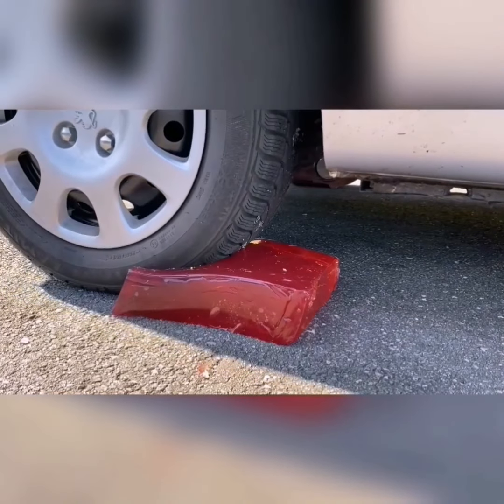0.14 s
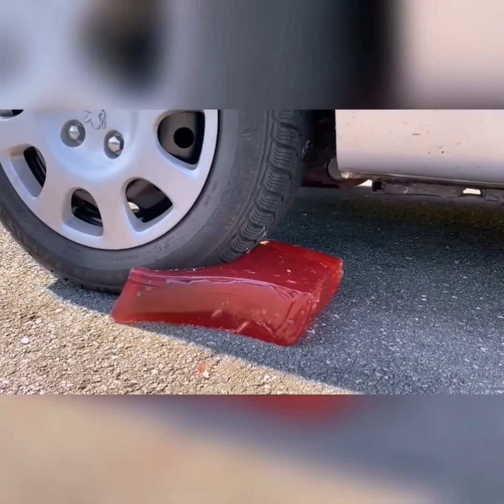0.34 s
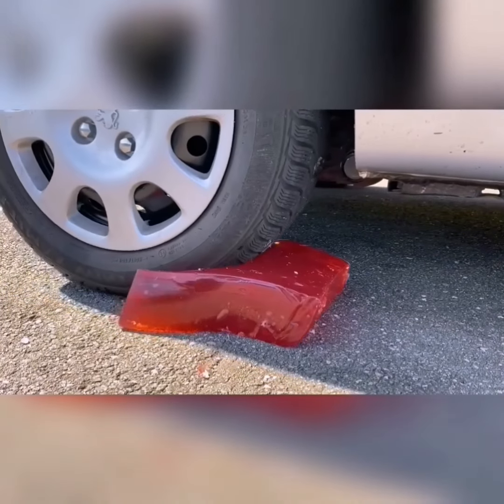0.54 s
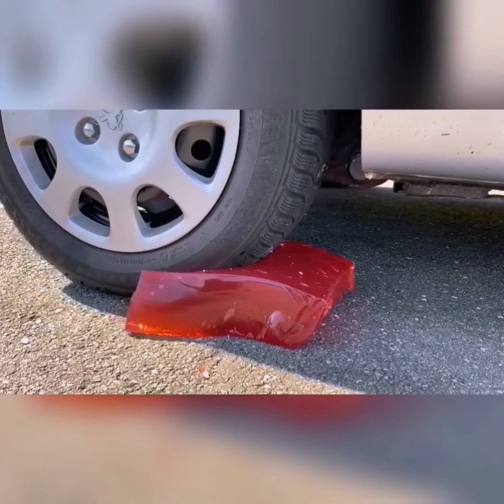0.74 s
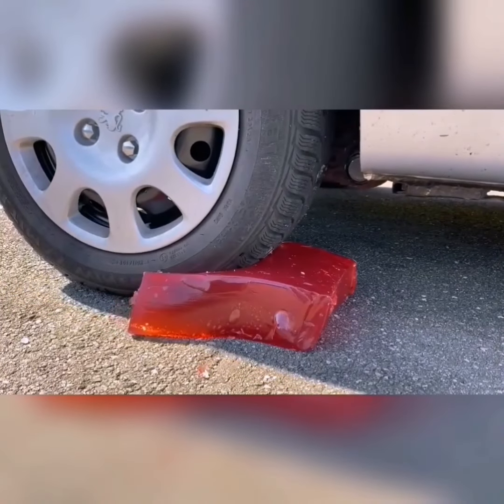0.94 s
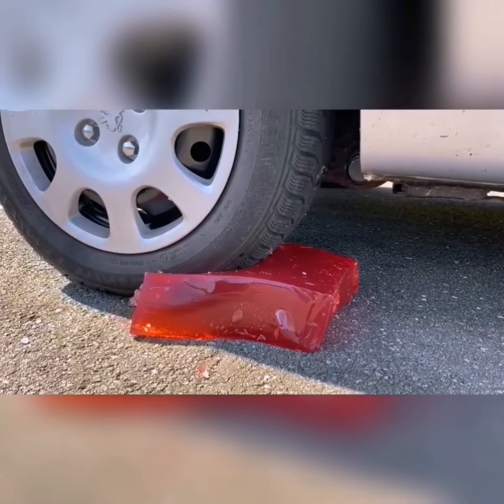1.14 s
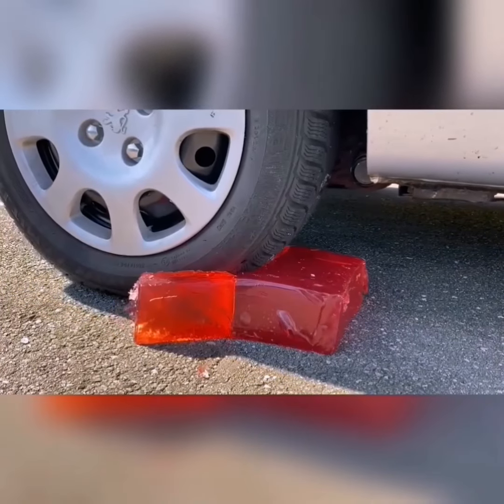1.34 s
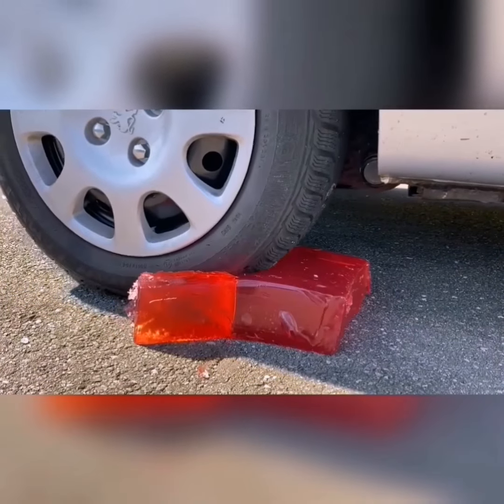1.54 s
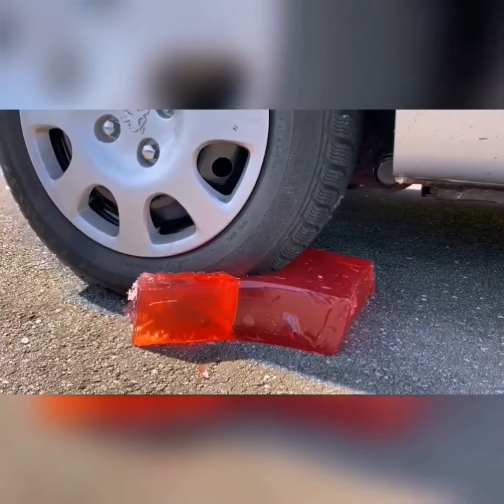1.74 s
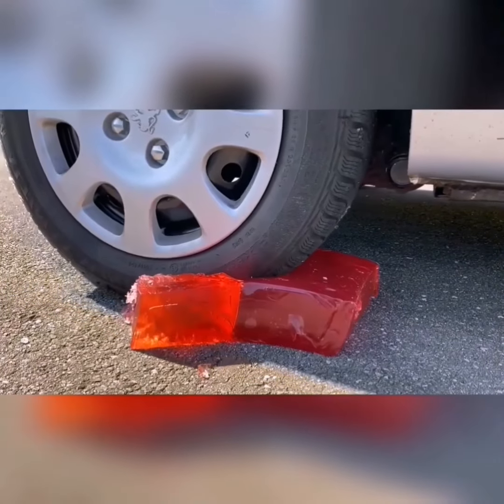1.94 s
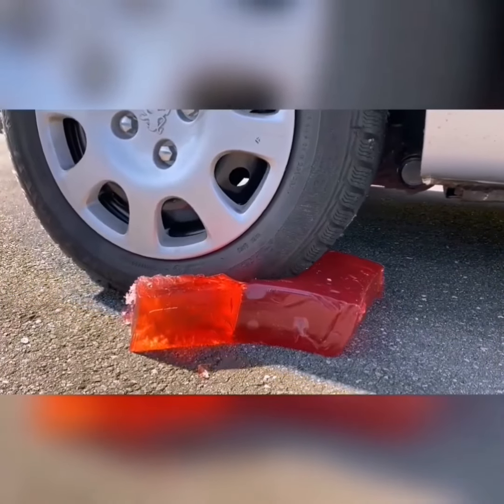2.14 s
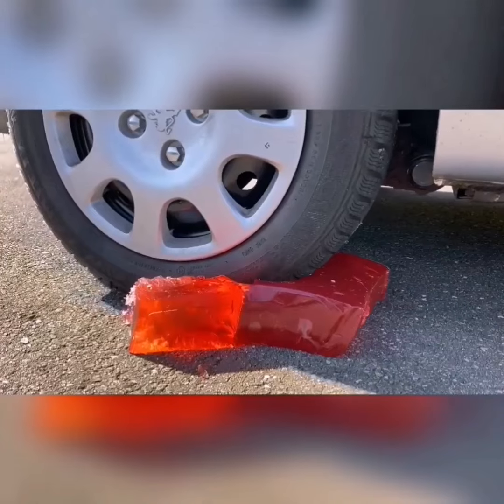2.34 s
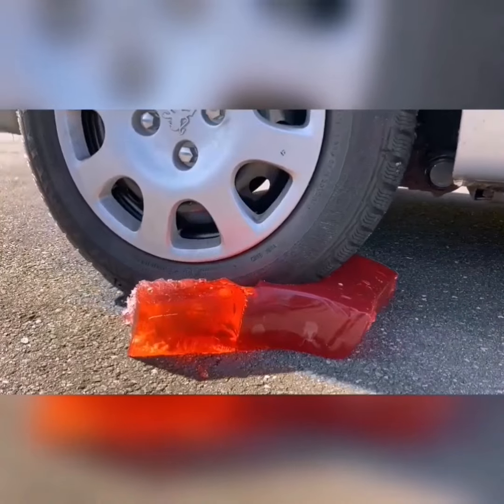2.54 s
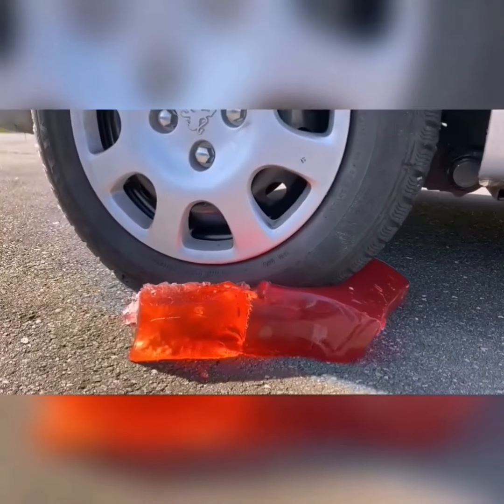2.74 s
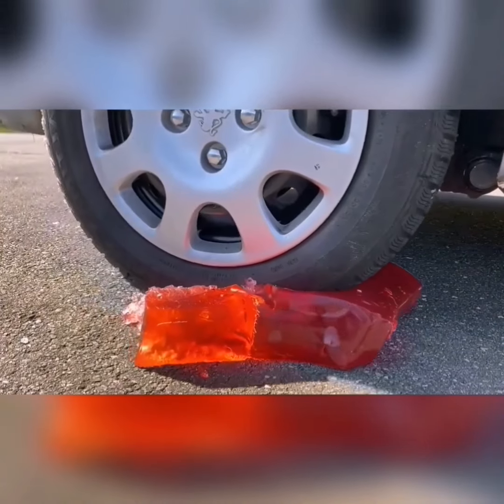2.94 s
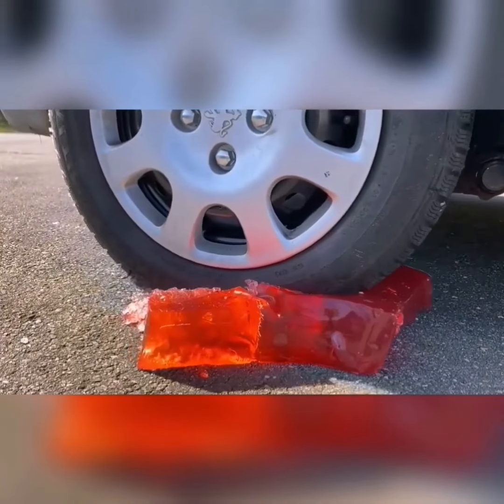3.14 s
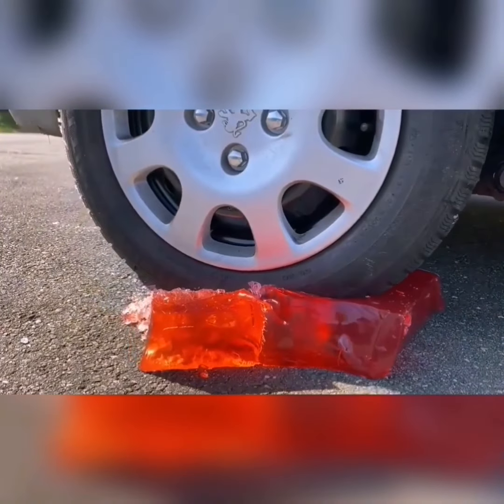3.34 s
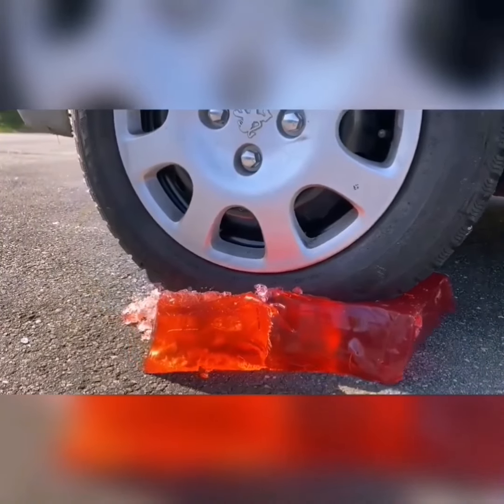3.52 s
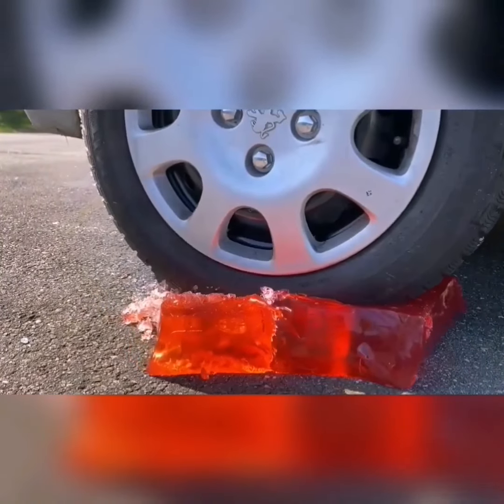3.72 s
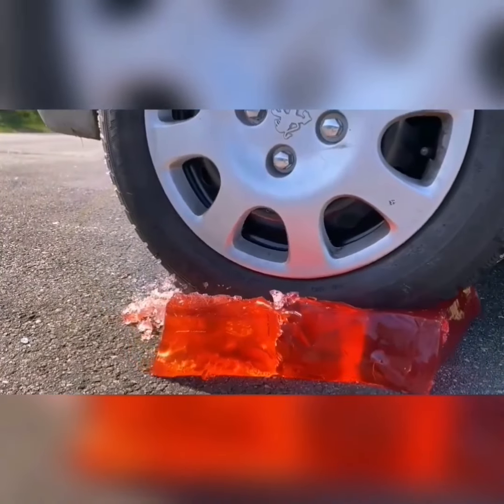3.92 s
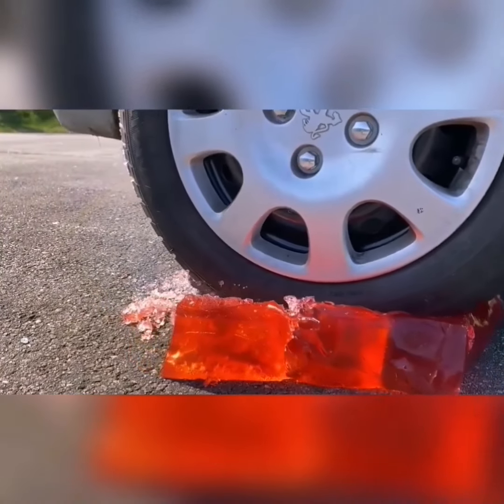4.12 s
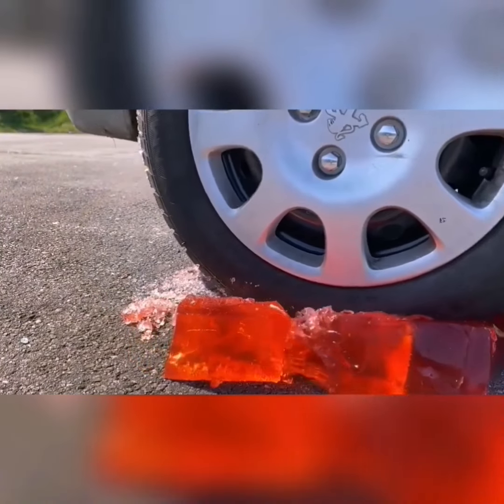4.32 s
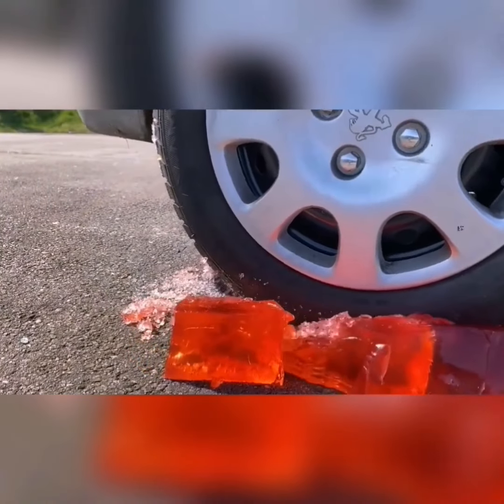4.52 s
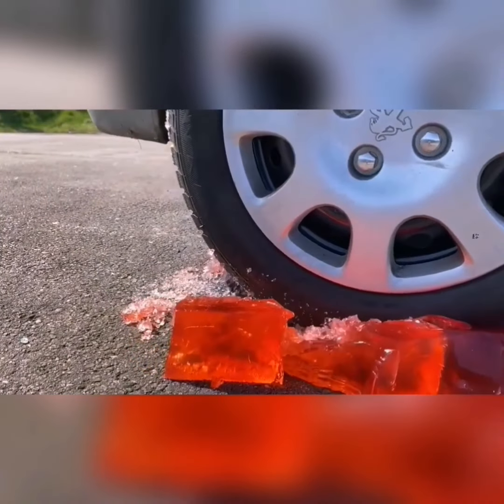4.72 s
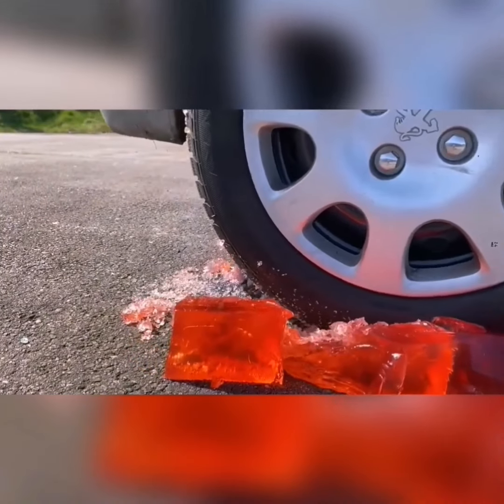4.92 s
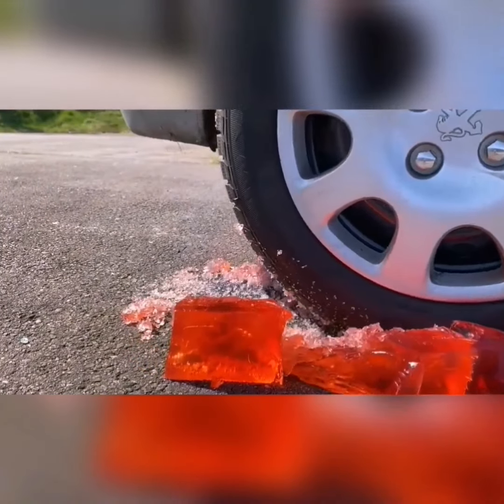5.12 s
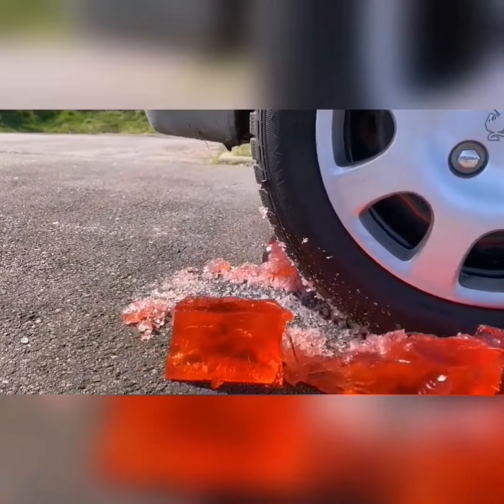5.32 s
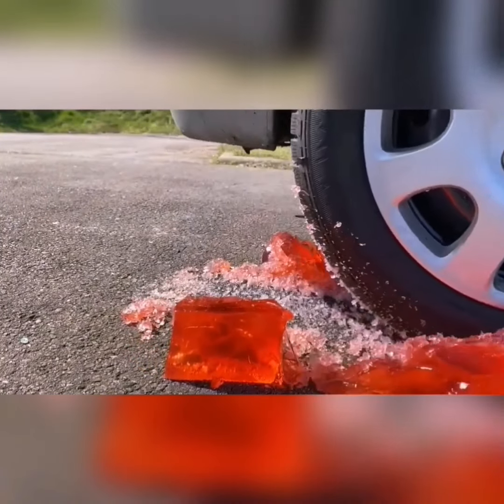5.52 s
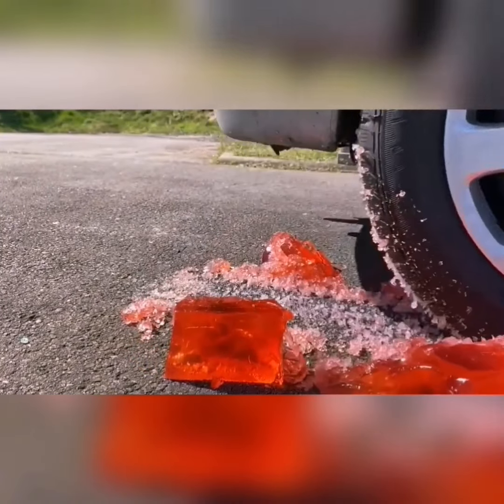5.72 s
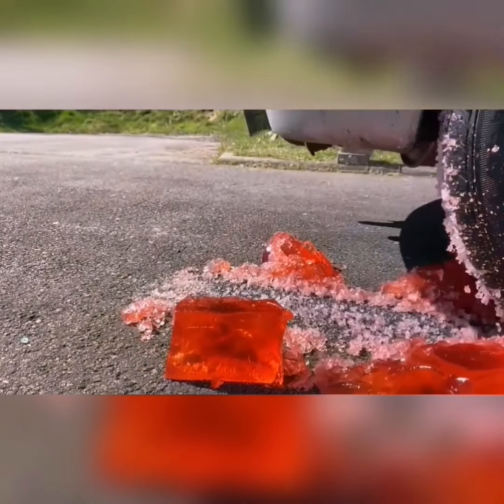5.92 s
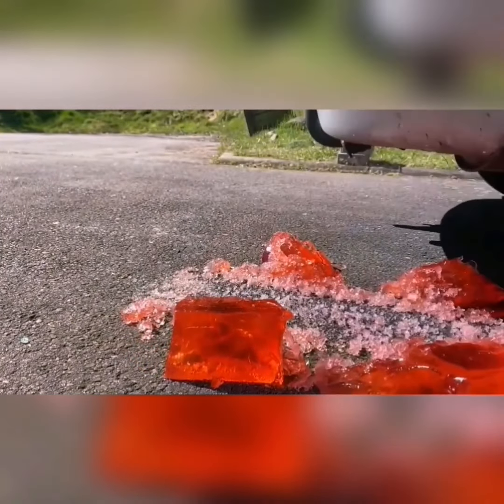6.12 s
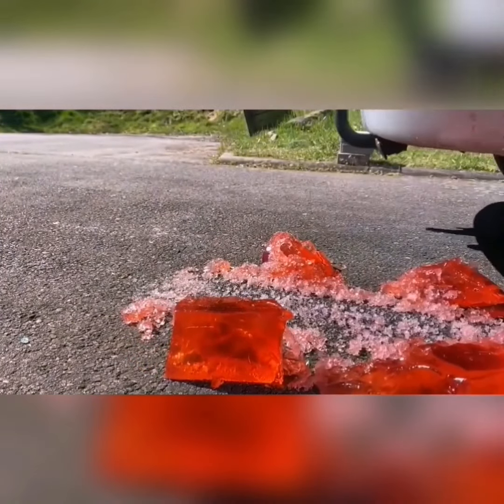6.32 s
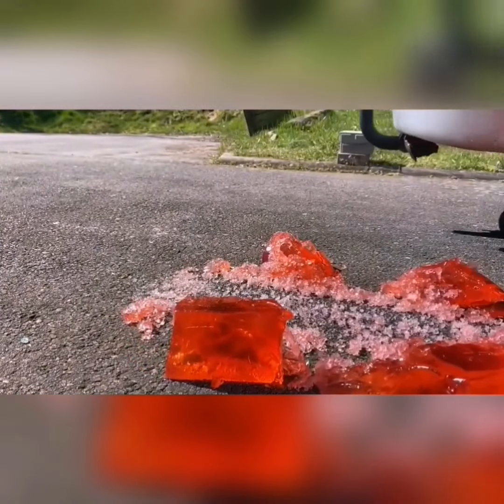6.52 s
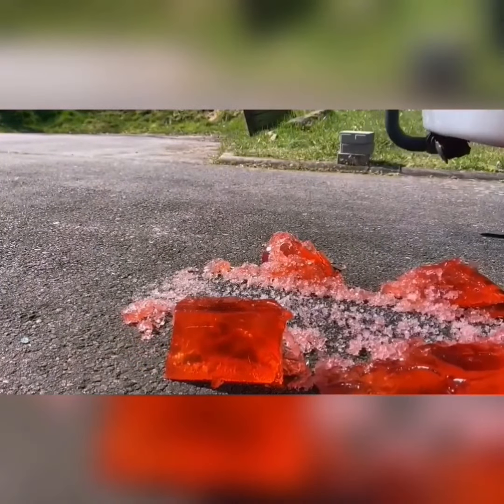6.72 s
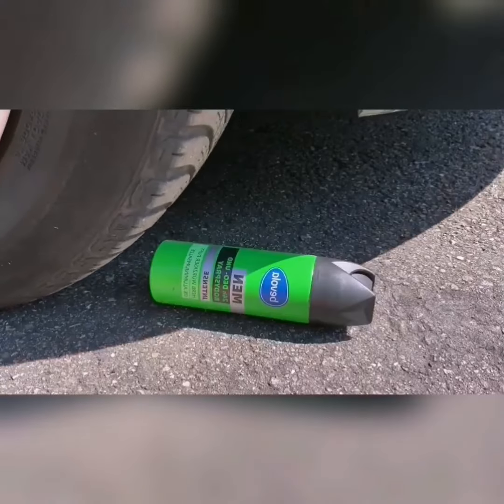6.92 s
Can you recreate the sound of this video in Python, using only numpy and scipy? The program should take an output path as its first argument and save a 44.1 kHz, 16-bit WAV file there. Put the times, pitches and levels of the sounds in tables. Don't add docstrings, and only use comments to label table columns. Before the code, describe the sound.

Outdoors on asphalt, a small petrol car creeps past a low microphone near its tyre. The exhaust drones and roars as the throttle is blipped repeatedly, each time higher. Gritty ticks, dull cracks, thuds and rubbing squeaks accompany jelly tearing under the tread. A loud bright snap and wet squirt come late, then the engine burbles down and abruptly gives way to thin hiss with scuffs.

```python
import sys
import numpy as np
from scipy import signal
from scipy.fft import rfft, irfft, next_fast_len
from scipy.io import wavfile
from scipy.ndimage import uniform_filter1d

SR = 44100
rng = np.random.default_rng(int(sys.argv[2]) if len(sys.argv) > 2 else 0)


def linear_from_db(decibels):
    return 10 ** (np.asarray(decibels, float) / 20)


def waveform_to_disk(signal):
    frames = np.transpose(np.atleast_2d(signal))
    scaled = np.clip(frames, -1, 1) * 32767
    samples = np.round(scaled).astype(np.int16)
    wavfile.write(sys.argv[1], SR, samples)


N = 306915
T = np.arange(N) / SR
CUT_S = 6.7645


def evened(x):
    return x / np.sqrt(np.mean(x ** 2) + 1e-20)


def read(points, hz):
    f, value = np.transpose(points)
    return np.interp(np.log(hz + 1), np.log(f + 1), value)


def columns(rows, t):
    s, *values = np.transpose(rows)
    return [np.interp(t, s, v) for v in values]


def add(mix, s, sound):
    part = mix[round(s * SR):][:len(sound)]
    part += sound[:len(part)]


def resonate(x, hz, width):
    r = np.exp(-np.pi * width / SR)
    return 2 * signal.lfilter([1 - r], [1, -r * np.exp(2j * np.pi * hz / SR)], x).real


def resonate_twice(x, hz, width):
    return resonate(resonate(x, hz, width), hz, width)


def wander(hz, t, count):
    steps_per_s = 60
    steps = rng.standard_normal((int(N / SR * steps_per_s) + 2, count))
    smooth = evened(signal.lfilter([1], [1, -np.exp(-2 * np.pi * hz / steps_per_s)], steps, axis=0))
    return np.array([np.interp(t, np.arange(len(steps)) / steps_per_s, s) for s in smooth.T])


def struck(rows):
    out, t = np.zeros(N), np.arange(3000) / SR
    rise = 1 - np.exp(-t / .0004)
    for s, db, hz, t60 in rows:
        add(out, s, linear_from_db(db - 60 * t / t60) * rise * np.sin(2 * np.pi * hz * t))
    return out


# [f/Hz, level/dB]
PORT_TILT = [(200, .3), (380, 0), (700, 3.8), (1290, 1.3), (2380, 1.2), (5000, 2), (8000, 0)]


def port_halves(lead, hz):
    return np.exp(.5j * read(lead, hz)) * linear_from_db(read(PORT_TILT, hz) / 2)


def ports(x, lead):
    size = next_fast_len(N + 4096)
    half = port_halves(lead, np.fft.rfftfreq(size, 1 / SR))
    return irfft(rfft(x, size) * np.array([half, 1 / half]), size)[:, :N]


def noise(field_db, lead, alike, start_s, patchy_db, streaky_db):
    size, hop = N - round(start_s * SR), 256
    hz, t = np.fft.rfftfreq(1024, 1 / SR), start_s + np.arange(size // hop + 5) * hop / SR
    a, b, c, d, patches, streaks = rng.standard_normal((len(t), len(hz), 6)).T
    patches = evened(uniform_filter1d(uniform_filter1d(patches, size=8, axis=0), size=10, axis=1))
    streaks = evened(uniform_filter1d(uniform_filter1d(streaks, size=2, axis=0), size=24, axis=1))
    same = np.clip(read(alike, hz), 0, 1)[:, None]
    half = port_halves(lead, hz)[:, None]
    left, other = a + 1j * b, c + 1j * d
    right = same * left + np.sqrt(1 - same ** 2) * other
    z = np.array([left * half, right / half])
    z *= linear_from_db(field_db(hz, t) + patchy_db * patches + streaky_db * streaks) * np.sqrt(SR / 1024)
    return signal.istft(z, nperseg=1024, noverlap=768)[1][:, :size]


# [t/s, firings per s]
FIRING_RATE = [(0, 34.5), (.17, 28.5), (.45, 22), (.7, 29), (.86, 30), (1.18, 26.9), (1.4, 29),
               (1.52, 25.4), (1.72, 42.6), (1.8, 46.7), (1.9, 47.3), (2.29, 44.2), (2.46, 36.2),
               (2.59, 37.9), (2.76, 42.8), (2.85, 43.2), (3.09, 40.9), (3.27, 49.8), (3.4, 52.3),
               (3.47, 56), (3.77, 44.5), (3.89, 50.2), (4.01, 55.5), (4.1, 53), (4.36, 50.8), (4.6, 74.2),
               (4.66, 65.4), (4.95, 62.7), (5.09, 70.9), (5.19, 78.5), (5.25, 73.8), (5.47, 64.7),
               (5.64, 52.4), (5.88, 50.2), (6.76, 22)]


def revs(t):
    return columns(FIRING_RATE, t)[0]


# [t/s, length/s, effort level/dB, gain while held/dB, brightness/dB per octave]
PEDAL_PRESSES = [(-.1, 0.049, -12, 3, 0), (0.5, 0.14, -4, 2.5, -0.5), (0.745, 0.095, -1, 4, 1),
                 (1.2, 0.25, -6.5, 2.5, -1), (1.568, 0.293, 6, 1, -1), (2.44, 0.35, 6, 4.5, 0),
                 (3.113, 0.27, 6.5, 3, -0.5), (3.813, 0.19, 3.5, 3, -4), (4.142, .05, -24, 3, 0),
                 (4.382, 0.19, 5.5, 2, -2), (4.962, 0.2, 7.5, -5, -1), (5.672, 0.25, -28, 5, 3),
                 (6.59, 0.21, -22, 3, 0)]


def pedal(t, orders):
    down_s, up_s, shut_off_db = 0.035, 0.093, 7
    s, length, db, build_db, bright_db = np.transpose(PEDAL_PRESSES)[:, :, None]
    pressed = np.clip((t - s) / down_s + 0.36, 0, 1)
    down = pressed * np.clip((s + length - t) / up_s + 0.57, 0, 1)
    burns = down * linear_from_db(db + build_db * np.clip((t - s) / length, 0, 1))
    colour = linear_from_db(bright_db * np.log2(orders.T / 3)).T
    shut = (down * np.minimum(linear_from_db(db + shut_off_db), 1)).sum(0)
    return colour @ burns, np.minimum(shut, 1)


# [f/Hz, level/dB]
PIPE_GAIN = [(23.9, -14), (45.6, -3), (68, 9.5), (84, 16.5), (96, 5.5), (111, -13.5), (126, 10.5),
             (138, 15), (153, 18), (165, 13.5), (180, -0.5), (196, 10), (215, 10.5), (240, -4), (268, 5.5),
             (300, 5), (340, -2), (400, -1), (500, -12), (800, -37), (1000, -28.5)]


def pipe_phase(hz):
    grid = np.arange(2049.)
    log_gain = np.log(linear_from_db(read(PIPE_GAIN, grid)))
    mirrored = np.r_[log_gain, log_gain[-2:0:-1]]
    return np.interp(hz, grid, -signal.hilbert(mirrored).imag[:len(grid)])


# [t/s, level/dB]
TAILPIPE_PASS = [(0.0, -54), (0.15, -52.5), (0.6, -42.5), (1.1, -48), (1.4, -43), (1.95, -45.5),
                 (2.3, -47.5), (2.9, -50), (3.55, -37.5), (4.05, -37.5), (4.3, -40), (4.7, -35.5),
                 (5.2, -35), (5.45, -30), (5.6, -36.5), (6.0, -41.5), (6.3, -42.5), (6.76, -53)]
# [f/Hz, level/dB]
PUMPING_PULL = [(30.0, 8), (45.0, 13.5), (70.0, 4), (100.0, -3), (150.0, -0.5), (172, -4.5), (205.0, -6),
                (255, 4), (300.0, -4.5), (450.0, -13)]
RUMBLE_EDGES = [62, 112, 182, 330]
# [f/Hz, width/Hz, level/dB against the band]
RUMBLE_RINGS = [(48, 40, -19), (82, 40, -19), (152, 22, -17), (262, 60, -15)]
# [t/s, length/s, extra rumble level/dB]
BURBLE_SPELLS = [
    (4.039, 0.37, 5),
    (4.6, .33, 6.5),
    (5.247, 0.42, 7.5),
    (5.843, 0.78, 10.5),
]


def exhaust():
    t = T[::256]
    orders = np.arange(2, 40)[:, None] / 2
    hz = orders * revs(t)
    burns, shut = pedal(t, orders)
    twist = np.exp(2.476j * (orders - 1))
    push = burns - (1 - shut) * linear_from_db(read(PUMPING_PULL, hz)) * twist
    half_order_db = -25 * (orders % 1 > 0)
    fall_db = -3 * np.maximum(orders - 4, 0)
    pipe_db = read(PIPE_GAIN, hz) + half_order_db + fall_db + columns(TAILPIPE_PASS, t)[0]
    push = push * linear_from_db(pipe_db) * np.exp(1j * pipe_phase(hz))

    under = [0] + [1 / (1 + (hz / edge) ** 24) for edge in RUMBLE_EDGES]
    bands = []
    for low, high in zip(under, under[1:]):
        power = (abs(push) ** 2 * (high - low)).sum(0)
        bands.append(np.sqrt(uniform_filter1d(power, size=9)))

    burble_db = 0
    for s, length, db in BURBLE_SPELLS:
        burble_db = burble_db + db * np.clip(np.minimum(t - s, s + length - t) / 0.037, 0, 1)
    overrun_db = -5 * (1.5 - shut) * (1 - under[3])
    smear_db = -0.3 * burble_db * (orders > 1)
    flutter_db = 0.6 * np.sqrt(orders) * wander(3.2, t, count=len(orders))
    heights = np.sqrt(2) * push * linear_from_db(overrun_db + smear_db + flutter_db)

    turns = np.cumsum(revs(T)) / SR
    slow_tones = 0
    for height, order in zip(heights, orders):
        phase = 2 * np.pi * order * turns[::8] + 2.62
        slow_tones = slow_tones + (np.interp(T[::8], t, height) * np.exp(1j * phase)).real
    out = signal.resample_poly(slow_tones, 8, 1)[:N]
    for (f, width, db), band in zip(RUMBLE_RINGS, bands):
        gas = evened(resonate_twice(rng.standard_normal(N), f, width))
        out += np.interp(T, t, linear_from_db(db + burble_db) * band) * gas
    return out, turns


# [t/s, level/dB]
BAY_CURVE = [(0, -52.5), (.06, -51.5), (.4, -56.5), (.7, -53.5), (1.19, -53), (1.23, -59), (1.5, -55),
             (1.65, -47.5), (2.35, -50), (2.47, -53), (2.7, -48), (3.1, -51.5), (3.8, -48.5), (4.3, -48),
             (5.4, -47), (5.9, -51.5), (6.3, -53.5), (6.76, -57.5)]
# [level/dB, share of bay curve, share of gulp, dB per octave of revs, late
# change/dB]
BAY_MIX = [
    (-32, 0.62, 0.33, 5, 1.5),
    (-32.5, 0.95, 0.88, 3.5, -3.5),
    (-50.5, 0.88, 0.96, 2, 1.2),
    (-63.5, 0.69, 1, 2.5, 2.5),
]
# [t/s, hold/s, level/dB]
INTAKE_GULPS = [
    (1.719, 0.075, 1.5),
    (3.193, 0.15, 4.5),
    (3.845, 0.12, 6.5),
    (4.429, 0.072, 6.5),
    (4.941, .16, 10),
]


def bay_layers(t):
    rise_s, fade_s = 0.026, 0.11
    gulp = 0
    for s, hold, db in INTAKE_GULPS:
        gulp = gulp + db * np.clip((t - s) / rise_s, 0, 1) * np.clip(1 - (t - s - hold) / fade_s, 0, 1)
    near, octaves = columns(BAY_CURVE, t)[0] + 50, np.log2(revs(t) / 45)
    late = np.clip((t - 5.55) / 0.26, 0, 1)
    return np.array([db + a * near + b * gulp + c * octaves + late * late_db
                     for db, a, b, c, late_db in BAY_MIX])


BAY_CENTRES = [480, 800, 2300, 8000]


def bay_level(hz, t):
    blend = np.array([read(list(zip(BAY_CENTRES, row)), hz) for row in np.eye(len(BAY_MIX))])
    return blend.T @ bay_layers(t)


# [f/Hz, level/dB per Hz against the bay level]
ROAR_COLOUR = [(120, -26.5), (205, -27), (270, -30), (500, -33.5), (800, -32), (1050, -36), (1300, -34.5),
               (2300, -30), (3200, -30), (5000, -34), (8000, -29.5), (10000, -28.5), (12000, -34.5),
               (14500, -32), (15600, -54)]
# [f/Hz, width/Hz, level/dB against the roar]
PANEL_RINGS = [(429.5, 33, -21.5), (508.2, 37.4, -12.5), (551.3, 58, -11.5), (630, 24, -14.5),
               (681.3, 19.4, -12.5), (754, 39, -11), (795, 15.5, -11.5), (1014.6, 29, -11.5),
               (1464, 22, -19), (1600, 19, -17), (1924, 16, -16.5), (2453, 24, -11.5), (2720, 17, -21),
               (3600, 28, -14.5)]
# [f/Hz, phase/rad]
CAR_LEAD = [(60, .1), (300, .2), (620, 1.75), (1100, 2.7), (1600, 5.5), (3400, 8.0), (6900, 6.0),
            (8550, 3.1), (10100, .1), (10900, -.5), (11400, -3.1), (12550, -3.2), (13300, -6.1),
            (15200, -8.0)]
# [f/Hz, likeness 0-1]
CAR_ALIKE = [(150, 1), (500, .5), (1000, .35), (2200, .88), (3500, .3), (5400, .15), (7000, .25),
             (8500, .99), (9300, .6), (10200, .99), (11000, .3), (11400, 1), (12550, 1), (12900, .5)]


def bay(turns):
    roar = noise(lambda hz, t: read(ROAR_COLOUR, hz)[:, None] + bay_level(hz, t),
                 CAR_LEAD, CAR_ALIKE, 0, patchy_db=1.57, streaky_db=2.0)
    hz, width, db = np.transpose(PANEL_RINGS)
    t, shaken = T[::256], rng.standard_normal(N)
    swing_db = 2.5 * wander(1.0, t, count=len(hz))
    gains = linear_from_db(db[:, None] + bay_level(hz, t) + swing_db)
    panels = np.zeros(N)
    for gain, f, w in zip(gains, hz, width):
        panels += np.interp(T, t, gain) * evened(resonate_twice(shaken, f, w))
    puffs = 1 + .18 * np.cos(2 * np.pi * turns - .8)
    return (roar + ports(panels, CAR_LEAD)) * puffs


def grit():
    stones_per_s, level_db, spread_db = 400, -24, 2.6
    struck_now = rng.random(N) < stones_per_s / SR
    size = linear_from_db(spread_db * np.minimum(rng.exponential(1, N), 2.5)) * struck_now
    stone, out = rng.integers(0, 12, N), np.zeros(N)
    for k, hz in enumerate(np.geomspace(1800, 9000, 12)):
        out += evened(resonate_twice(size * (stone == k), hz, 0.4 * hz))
    clatter_db = bay_layers(T)[2]
    return linear_from_db(clatter_db + level_db) * out


# [t/s, f/Hz, level/dB]
PULLEY_WHINE = [(0.0, 6140, -83), (0.22, 6030, -68), (0.396, 6043, -77), (0.422, 6080, -63),
                (0.918, 6020, -72), (0.944, 6030, -62), (1.106, 6035, -72), (1.5, 6026, -76)]


def whistle():
    hz, db = columns(PULLEY_WHINE, T)
    tone = np.sin(2 * np.pi * np.cumsum(hz) / SR)
    return np.sqrt(2) * linear_from_db(db - 2.0) * tone * (T < PULLEY_WHINE[-1][0])


# [t/s, length/s, f/Hz,
# width/Hz, level/dB rms]
ROUGH_BANDS = [(1.54, .025, 5000, 250, -60), (1.555, .06, 4520, 200, -55), (1.575, .035, 3200, 150, -52),
               (4.44, .1, 2600, 900, -43), (4.75, .18, 175, 50, -33), (3.85, .06, 1600, 500, -44),
               (4.945, .06, 1950, 400, -40), (4.96, .19, 2650, 350, -41), (5.0, .085, 4750, 500, -44),
               (5.01, .045, 3600, 600, -43), (5.02, .06, 1500, 300, -35), (5.085, .07, 1550, 350, -38),
               (5.14, .1, 1900, 1200, -44), (5.14, .03, 3300, 600, -48), (3.2, .18, 950, 200, -42),
               (6.25, .12, 250, 40, -40), (1.46, .1, 215, 50, -40), (.2, .3, 215, 40, -47),
               (5.3, .24, 270, 40, -36), (4.5, .08, 262, 25, -30)]


def crunches():
    out = np.zeros(N)
    for s, length, hz, width, db in ROUGH_BANDS:
        rub, lumps = rng.standard_normal((2, 16000))
        grain_db = 4 * evened(uniform_filter1d(lumps, size=200))
        rub = resonate_twice(rub * linear_from_db(grain_db), hz, width)
        rub = rub[2000:][:round(length * SR)]
        add(out, s, linear_from_db(db) * evened(rub) * signal.windows.tukey(len(rub), .5))
    return out


# [t/s, peak level/dB, f/Hz, t60/s]
DULL_CRACKS = [(1.0111, -39, 1662, .03), (1.0859, -41, 2300, 0.065), (2.2796, -38, 1543, 0.057),
               (2.4495, -39, 1657, .03), (2.9808, -26.5, 1798, 0.022), (2.9924, -37, 1900, 0.02),
               (3.6426, -26, 1700, 0.029), (4.3491, -48, 1581, .026), (4.943, -25, 1898, .04),
               (5.326, -40, 4300, .015), (6.0055, -38, 2230, .02), (6.0295, -35, 2902, .015),
               (6.4036, -50, 2440, .02), (6.4844, -36, 2480, .02), (1.2022, -41, 2504, .012),
               (1.02, -45, 4770, .015), (4.969, -32, 2090, .03), (5.0086, -28, 2710, .03),
               (5.08, -30, 2200, .02), (6.404, -44, 6001, .02), (5.7453, -33, 3106, 0.017),
               (5.9422, -38, 3577, 0.037), (6.0132, -32, 1638, 0.037), (6.0292, -27, 1620, 0.017),
               (6.085, -42, 5330, 0.037), (6.1085, -45, 1860, 0.031), (6.2073, -36, 3587, 0.022),
               (6.2424, -36, 2720, 0.022), (6.2731, -51, 1535, .036), (6.427, -41, 2302, 0.027),
               (6.5842, -26, 3350, 0.022), (6.6, -34, 2100, 0.024)]
BRIGHT_CRACKS = [(1.0784, -41, 10430, 0.035), (1.2022, -38, 6070, 0.012), (4.4332, -31, 7450, 0.018),
                 (5.3248, -30, 5890, .02), (5.5613, -17, 8500, 0.012), (5.7782, -29.5, 11360, .018),
                 (5.9304, -33, 9600, .025), (6.584, -40, 6560, .015), (6.6094, -41, 7410, 0.024)]
TYRE_THUDS = [(1.097, -27, 764, 0.04), (2.5, -22, 570, .04), (2.9925, -15, 774, 0.04),
              (4.352, -21, 470, 0.032), (2.4, -27, 610, 0.035), (2.449, -26, 650, 0.04),
              (5.4, -15, 470, .05)]


def cracks():
    out, t = np.zeros(N), np.arange(3000) / SR
    for rows, width_hz in (DULL_CRACKS, 1200), (BRIGHT_CRACKS, 6800), (TYRE_THUDS, 600):
        for s, db, hz, t60 in rows:
            snap = rng.standard_normal(len(t)) * linear_from_db(-60 * t / t60) * np.minimum(t / 0.00031, 1)
            ring = resonate(resonate_twice(snap, hz, width_hz), hz, 1.3 * width_hz)
            add(out, s, linear_from_db(db) * ring / abs(ring).max())
    return out


# [t/s, length/s, f/Hz, level/dB rms]
RUBBING_SQUEAKS = [(1.575, 0.035, 4550, -54), (1.585, .025, 3200, -57), (1.7, 0.2, 625, -36.5),
                   (1.72, .08, 760, -38), (1.79, .07, 505, -43), (2.169, 0.068, 671.6, -37),
                   (2.249, .2, 755, -42), (2.334, .12, 675, -38), (2.15, .1, 941, -44),
                   (3.28, .12, 1000, -41), (3.55, .1, 520, -35.5), (3.89, 0.15, 1460, -43),
                   (5.17, 0.035, 800, -32), (6.72, .03, 900, -44), (3.875, 0.125, 3600, -45),
                   (4.045, 0.087, 2960, -50), (3.96, .03, 7300, -60), (4.945, .04, 560, -28),
                   (5.015, .05, 780, -28), (5.07, .09, 795, -31), (5.575, 0.073, 499, -36),
                   (5.65, 0.099, 508, -29.5), (5.82, 0.091, 603, -36), (3.86, 0.14, 761, -31),
                   (3.199, 0.23, 784, -34), (4.45, 0.12, 700.6, -45)]


def squeaks():
    out = np.zeros(N)
    for s, length, hz, db in RUBBING_SQUEAKS:
        slow = uniform_filter1d(rng.standard_normal((2, 12000)), size=500, axis=1)
        bend, swell = slow[:, :round(length * SR)] * np.sqrt(500)
        pitch = hz * (1 + .004 * min(1, 1200 / hz) * bend)
        tone = np.sin(2 * np.pi * np.cumsum(pitch) / SR) * linear_from_db(2.7 * swell)
        add(out, s, linear_from_db(db) * evened(tone) * signal.windows.tukey(len(tone), .6))
    return out


# [t/s, length/s, level/dB rms]
SHAFT_MOANS = [
    (1.74, .42, -40.5),
]


def moans(turns):
    swell = 0
    for s, length, db in SHAFT_MOANS:
        swell = swell + linear_from_db(db) * np.clip(np.minimum(T - s, s + length - T) / .06, 0, 1)
    return np.sqrt(2) * swell * np.sin(2 * np.pi * 9.5 * turns)


# [t/s, level/dB]
LONE_BURNS = [(3.555, -15), (4.047, -17), (4.067, -17.5), (4.086, -21), (4.205, -14.5), (4.245, -23),
              (4.266, -14.5), (4.295, -15), (4.314, -18), (5.905, -18), (6.009, -19), (6.034, -18),
              (6.06, -16.5), (6.084, -15), (6.148, -18), (6.179, -17), (6.276, -22), (6.334, -15.5),
              (6.363, -21.5), (6.514, -19), (6.595, -28.5), (6.644, -28), (6.704, -26), (6.744, -24.5)]
# [f/Hz, level/dB, t60/s]
THUMP_RING = [(55.46, -6.5, 0.057), (149, 0, 0.087), (255, -19, 0.072)]


def pops():
    out, t = np.zeros(N), np.arange(6000) / SR
    thump = sum(linear_from_db(db - 60 * t / t60) * np.sin(2 * np.pi * hz * t) for hz, db, t60 in THUMP_RING)
    for s, db in LONE_BURNS:
        add(out, s, -linear_from_db(db) * thump)
    return out


# [middle t/s, length/s, level/dB rms, brightness/dB per octave]
JELLY_SQUIRTS = [
    (5.4, 0.022, -48, -7),
    (5.658, 0.058, -31.5, 1.5),
    (4.49, 0.079, -47, -14),
    (6.14, 0.11, -47, -1),
    (6.226, 0.044, -48.5, -1),
    (3.6, 0.033, -49, -14),
]


def squirts():
    out, hz = np.zeros(N), np.fft.rfftfreq(4096, 1 / SR)
    for s, length, db, slope_db in JELLY_SQUIRTS:
        colour = linear_from_db(slope_db * np.log2(hz / 5000 + 0.0102)) * (hz > 1800) * (hz < 15300)
        air = irfft(rfft(rng.standard_normal(4096)) * colour)[:round(length * SR)]
        add(out, s - length / 2, linear_from_db(db) * evened(air) * np.hanning(len(air)))
    return out


# [t/s, peak level/dB, f/Hz, t60/s]
BIG_SNAP = [(5.5613, -16, 9650, .012), (5.5614, -22, 7900, .01), (5.5618, -24, 6000, .012),
            (5.5616, -22, 4720, 0.02), (5.5626, -14, 2530, .022), (5.572, -38, 9900, .025),
            (5.5613, -27, 13800, .008)]


def big_snap():
    return struck(BIG_SNAP)


# [t/s, length/s, f/Hz, level/dB rms]
OUTDOOR_SCUFFS = [(6.766, 0.014, 1100, -41), (6.77, .016, 1400, -38.5), (6.772, .012, 500, -38),
                  (6.785, .012, 400, -39), (6.808, .018, 401, -34.5), (6.826, 0.02, 1260, -39),
                  (6.84, 0.031, 520, -42), (6.866, 0.024, 1020, -36.5), (6.88, .02, 800, -40),
                  (6.886, 0.018, 1300, -35), (6.8, 0.029, 1690, -46), (6.87, .085, 1690, -44),
                  (6.91, 0.043, 1000, -42), (6.915, .03, 1300, -41), (6.8, 0.073, 2780, -50),
                  (6.934, 0.025, 380, -35), (6.94, .016, 600, -38)]


def scuffs():
    out = np.zeros(N)
    for s, length, hz, db in OUTDOOR_SCUFFS:
        rub = resonate_twice(rng.standard_normal(12000), hz, 2.3 / length)
        rub = rub[6000:][:round(length * SR)]
        add(out, s, linear_from_db(db) * evened(rub) * signal.windows.tukey(len(rub), .7))
    return out


# [f/Hz, level/dB per Hz]
HISS_COLOUR = [(120, -82), (190, -44), (240, -8.5), (400, -3), (1000, -1.5), (1750, -6), (2150, -13),
               (2800, -11), (5000, -16.5), (9000, -17), (12000, -20), (15300, -21), (15700, -60)]
# [t/s, level/dB]
HISS_LEVEL = [(6.765, -37.5), (6.933, -38.5), (6.947, -36), (6.96, -37)]
# [f/Hz, phase/rad]
HISS_LEAD = [(300, 0), (7500, .6), (8750, 3.05), (9500, 3.2), (10500, 5.5), (12300, 7.0), (12900, 9.35),
             (13800, 9.5), (14800, 11.5)]
# [f/Hz, likeness 0-1]
HISS_ALIKE = [(200, .3), (1400, .65), (3000, .15), (7000, .3), (8750, 1), (9500, 1), (11000, .6),
              (12900, 1), (13800, 1), (15000, .8)]
# [t/s, peak level/dB, f/Hz, t60/s]
FIRST_TICKS = [
    (6.7648, -29, 1200, .02),
    (6.7648, -33, 2000, .012),
    (6.7648, -36, 4500, .008),
    (6.774, -30, 1400, .015),
]


def after_cut():
    hiss = noise(lambda hz, t: read(HISS_COLOUR, hz)[:, None] + 0 * t,
                 HISS_LEAD, HISS_ALIKE, CUT_S, patchy_db=1.4, streaky_db=1.2)
    hiss = np.pad(evened(hiss), ((0, 0), (N - hiss.shape[1], 0)))
    level_db = columns(HISS_LEVEL, T)[0] + 2.0 + 0.88 * wander(23.0, T, count=1)[0]
    thin = signal.butter(6, 210, "high", fs=SR, output="sos")
    return hiss * linear_from_db(level_db) + signal.sosfilt(thin, scuffs() + struck(FIRST_TICKS))


# [f/Hz, phase/rad]
TREAD_LEAD = [(300, 0), (2200, 6.3), (3400, 8.0), (6800, 6.2), (8500, 4.2), (10000, 6.0), (12000, 8.2),
              (15000, 6.5)]


def scene():
    drone, turns = exhaust()
    roar = bay(turns)
    loose = ports(grit() + squirts(), CAR_LEAD)
    tones = ports(drone + pops() + whistle() + squeaks() + crunches() + moans(turns), CAR_LEAD)
    soften = signal.butter(12, 16000, fs=SR, output="sos")
    snaps = ports(signal.sosfilt(soften, cracks() + big_snap()), TREAD_LEAD)
    car = tones + roar + loose + snaps
    cut = np.clip((T - CUT_S) / .001, 0, 1)
    return car * (1 - cut) + after_cut() * cut


def roll_off(x):
    return signal.sosfilt(signal.butter(12, 16510, fs=SR, output="sos"), x)


def record(dry):
    finished = signal.lfilter(*signal.butter(2, 18, "high", fs=SR), dry)
    return roll_off(finished)


dry = scene()
out = record(dry)
waveform_to_disk(out)
```